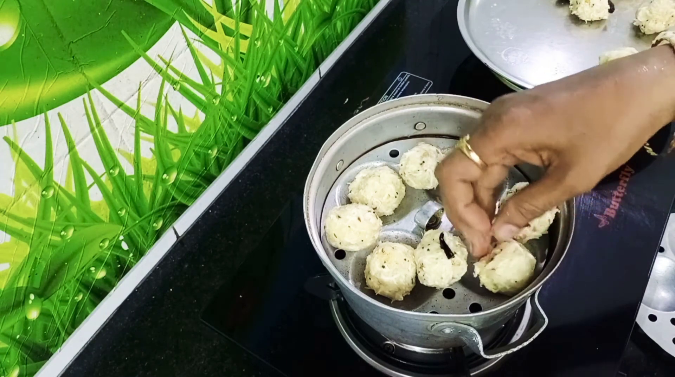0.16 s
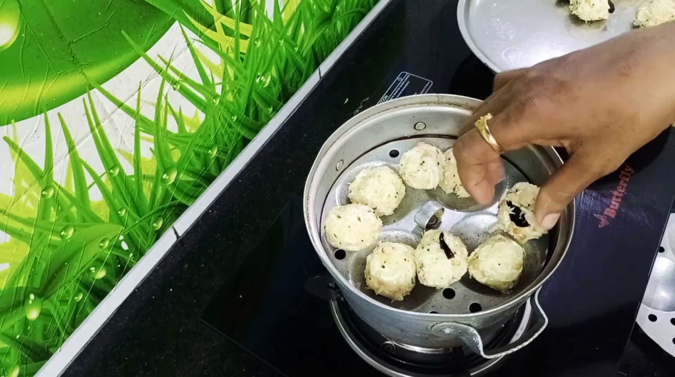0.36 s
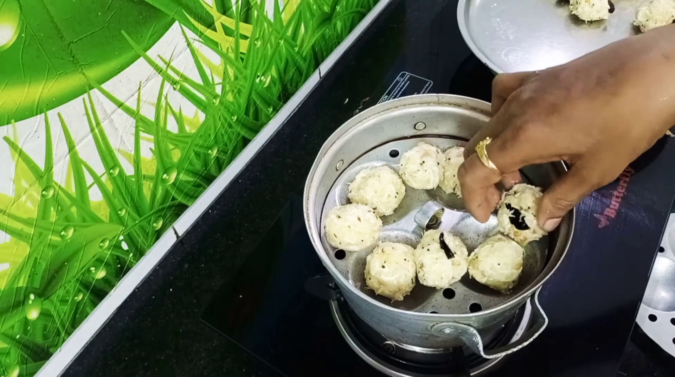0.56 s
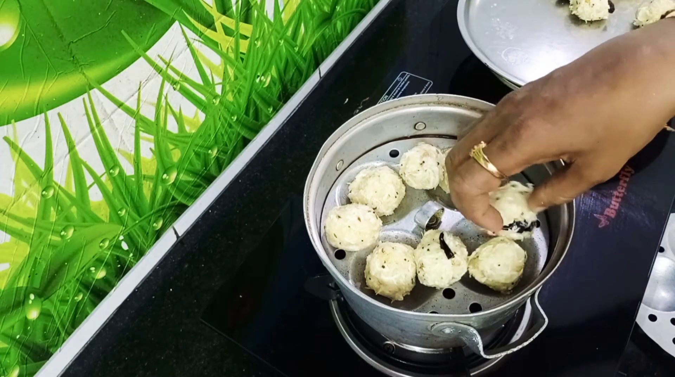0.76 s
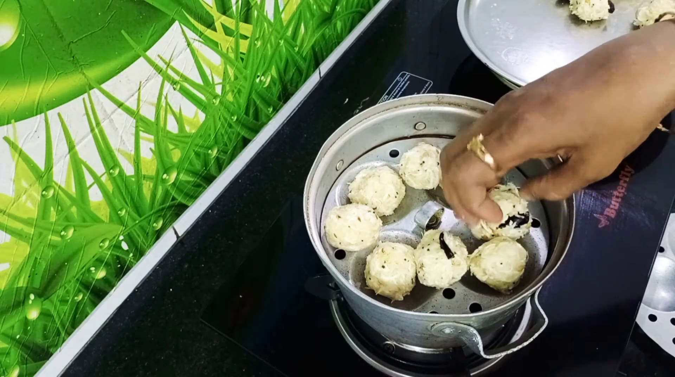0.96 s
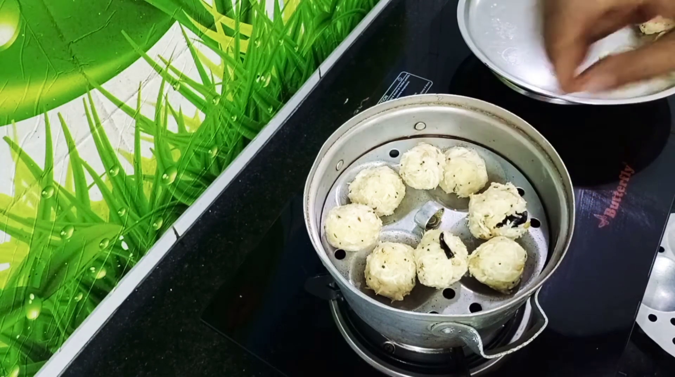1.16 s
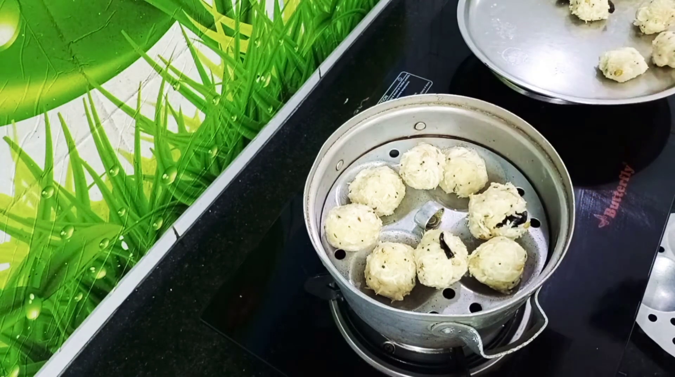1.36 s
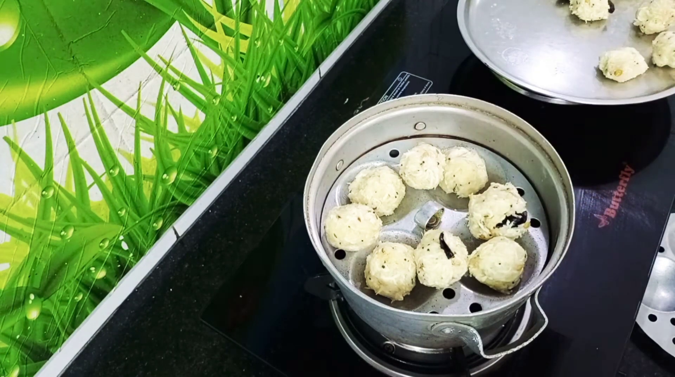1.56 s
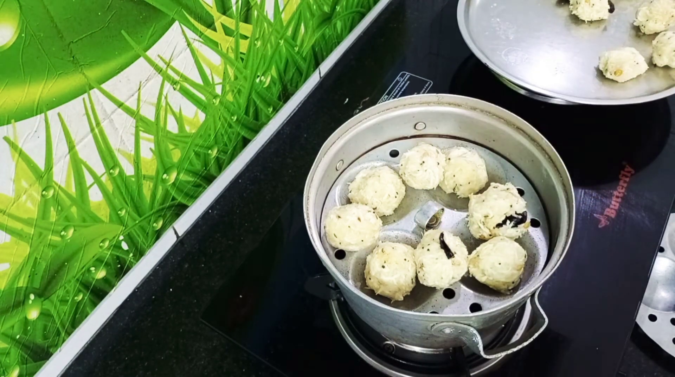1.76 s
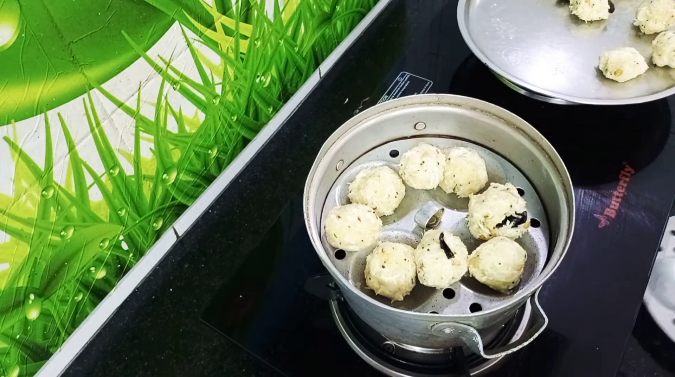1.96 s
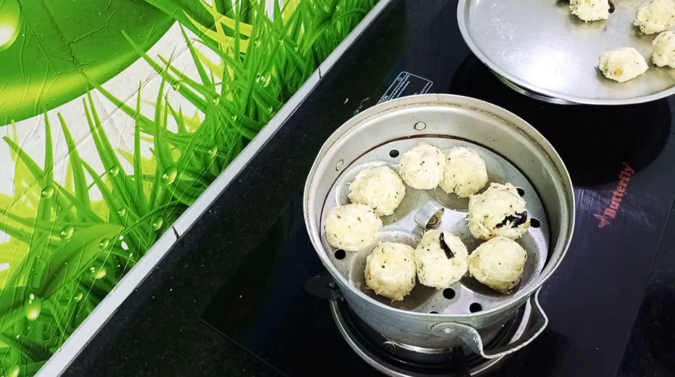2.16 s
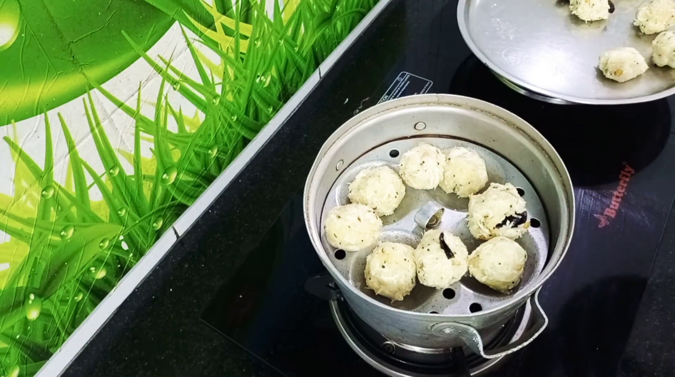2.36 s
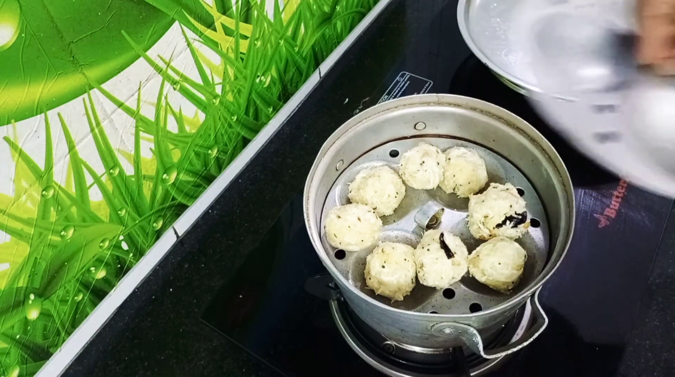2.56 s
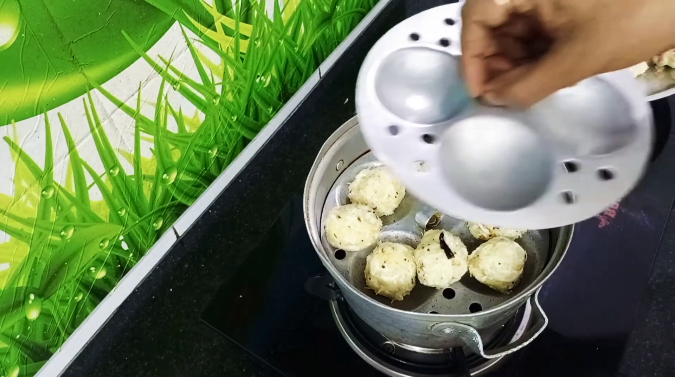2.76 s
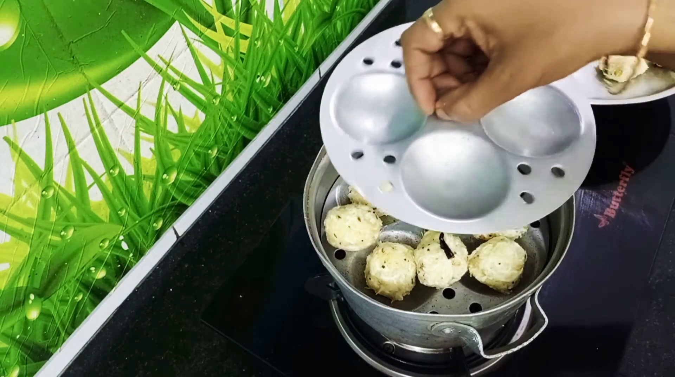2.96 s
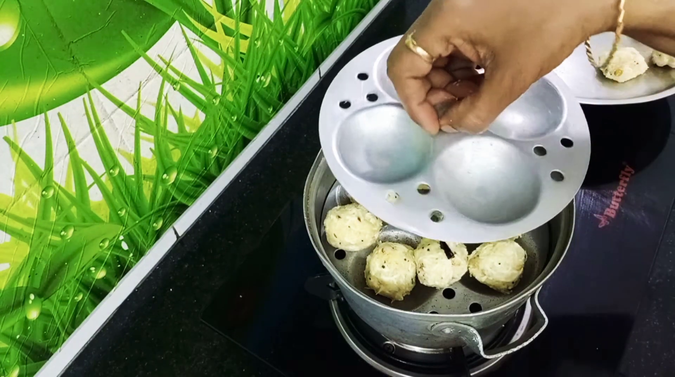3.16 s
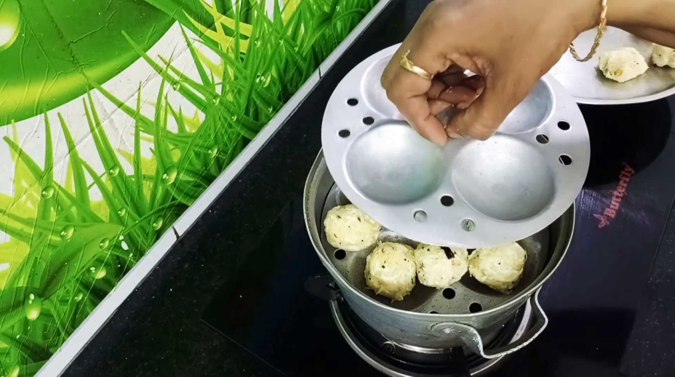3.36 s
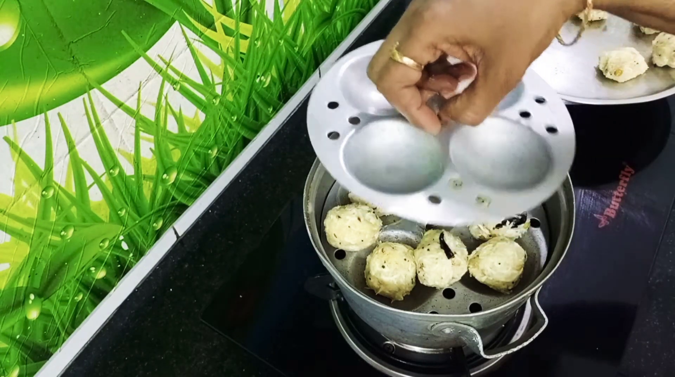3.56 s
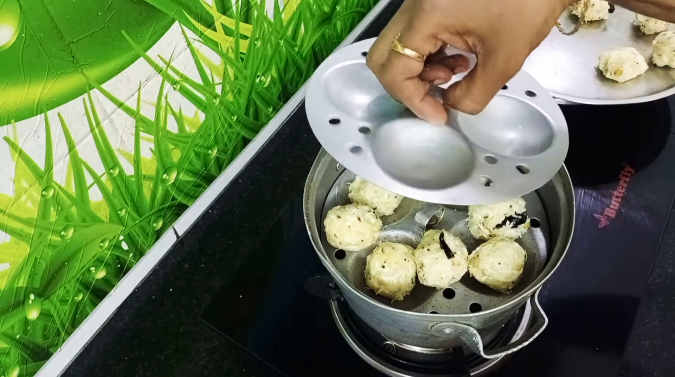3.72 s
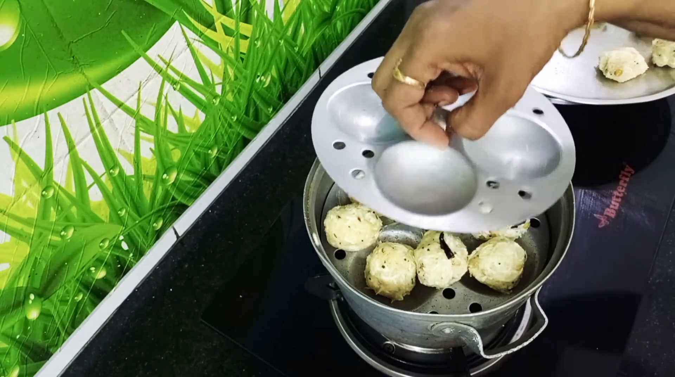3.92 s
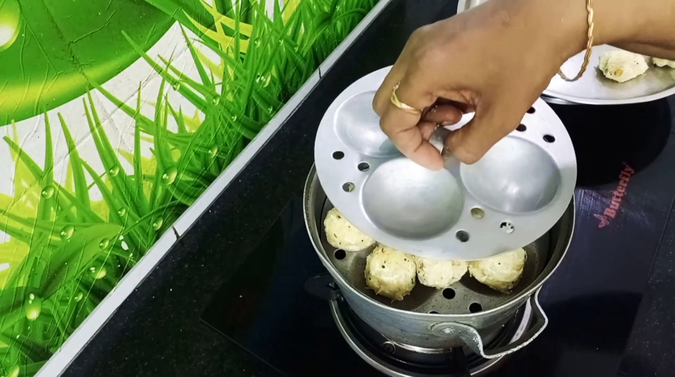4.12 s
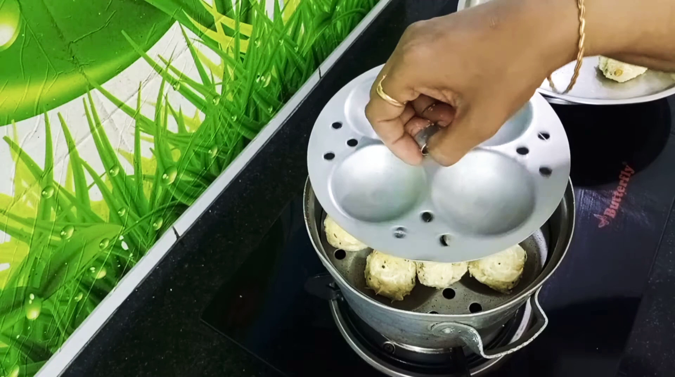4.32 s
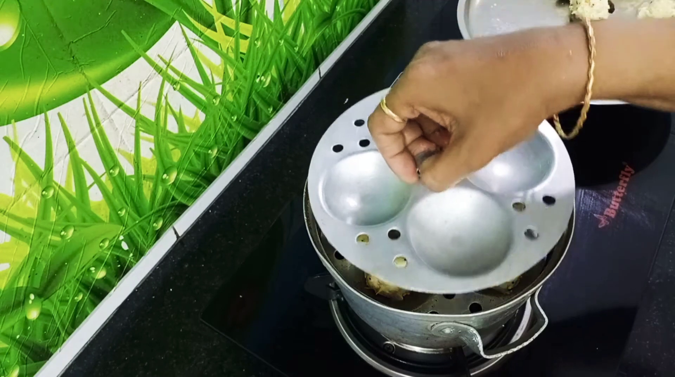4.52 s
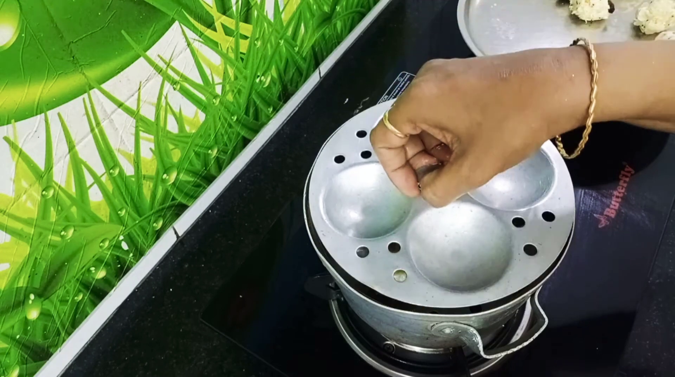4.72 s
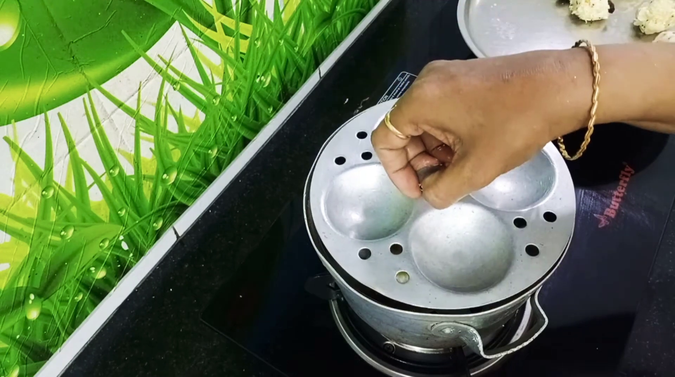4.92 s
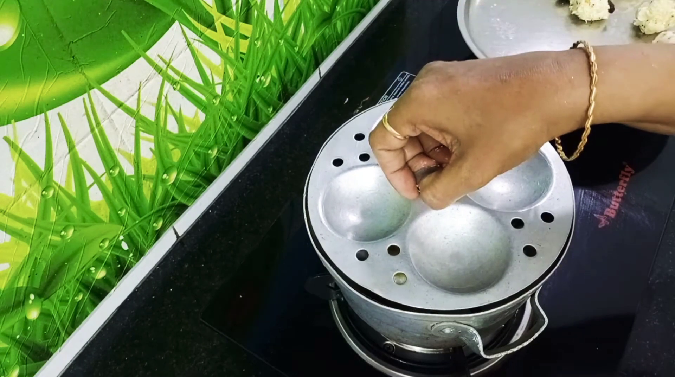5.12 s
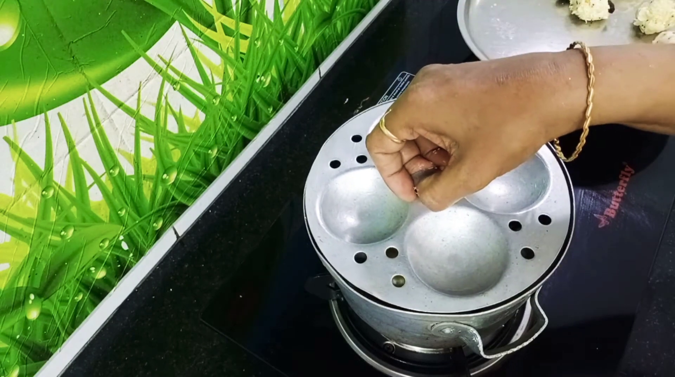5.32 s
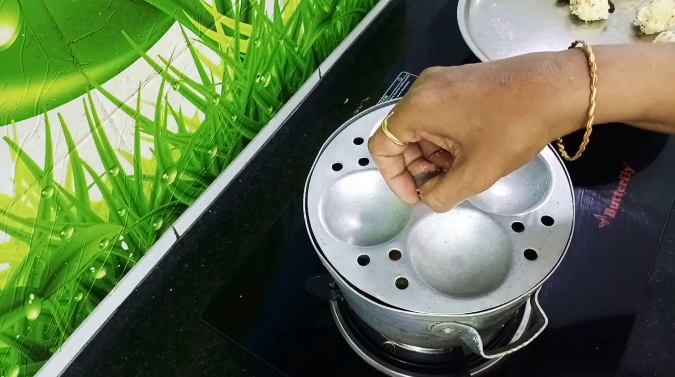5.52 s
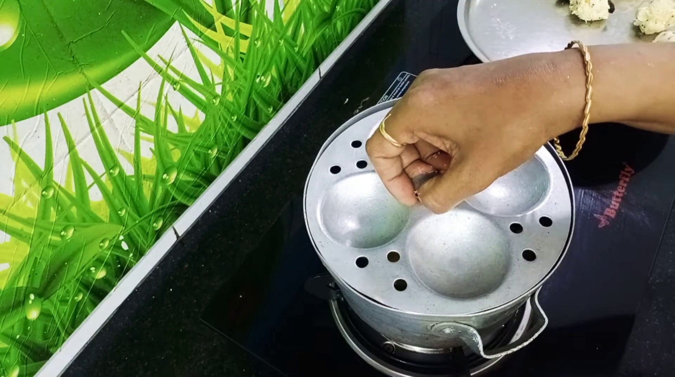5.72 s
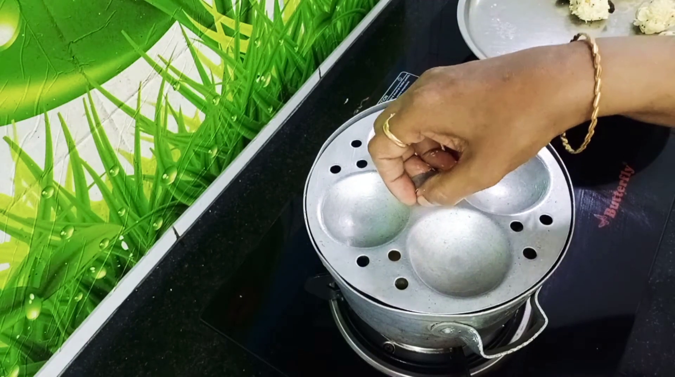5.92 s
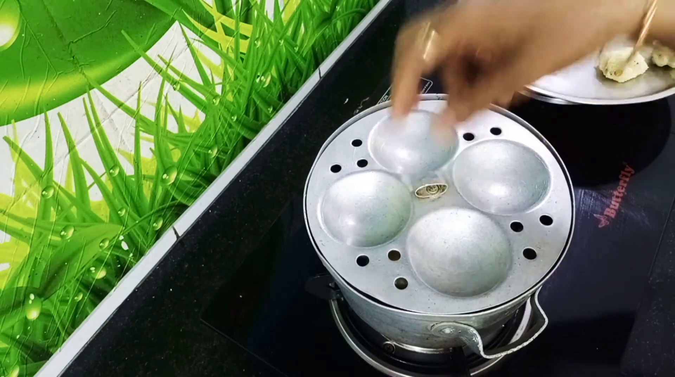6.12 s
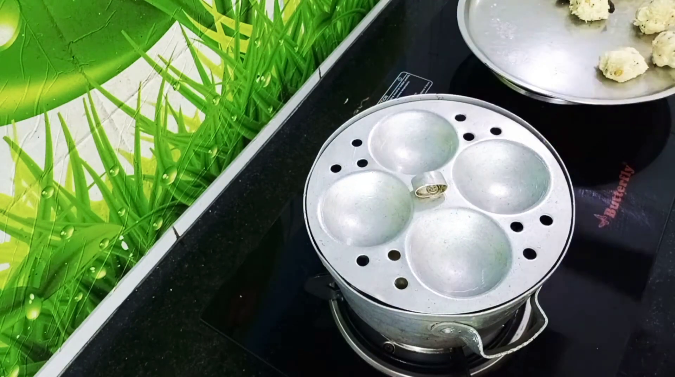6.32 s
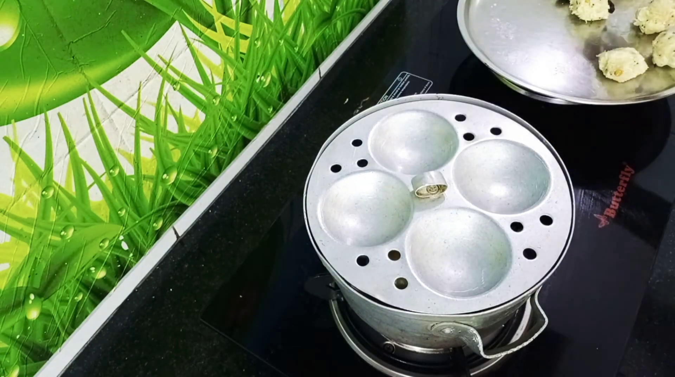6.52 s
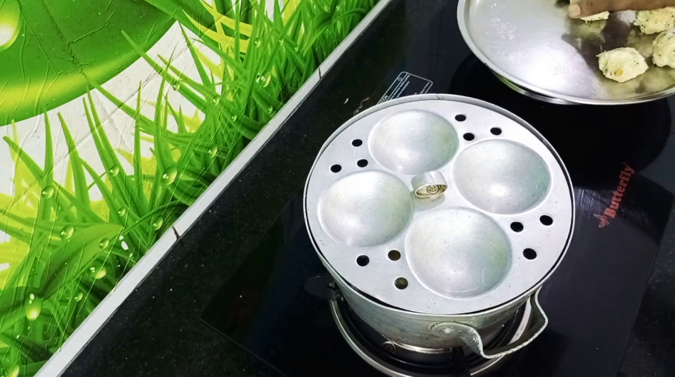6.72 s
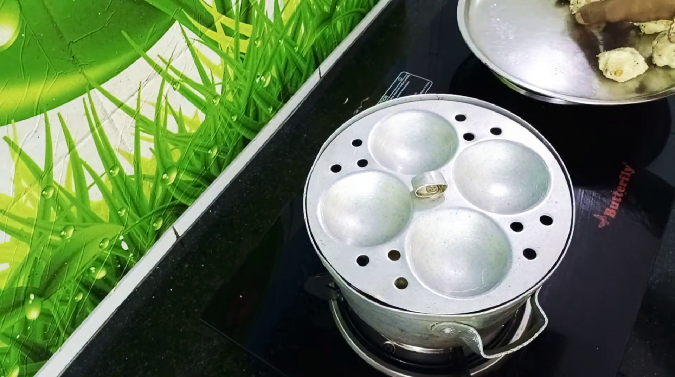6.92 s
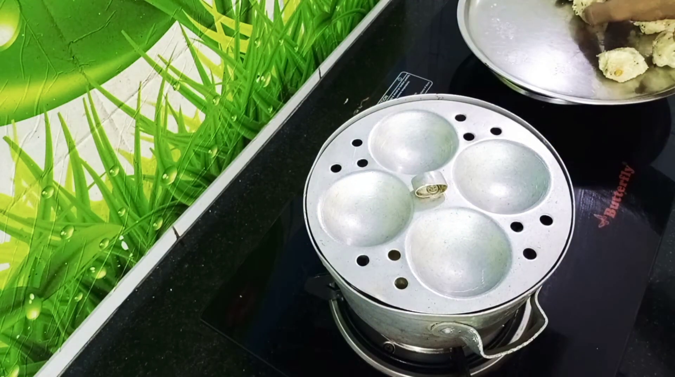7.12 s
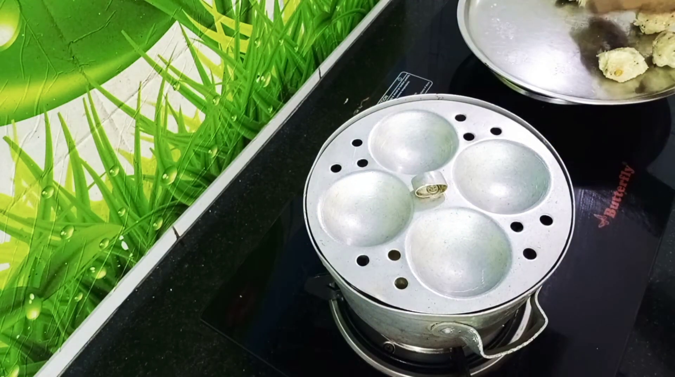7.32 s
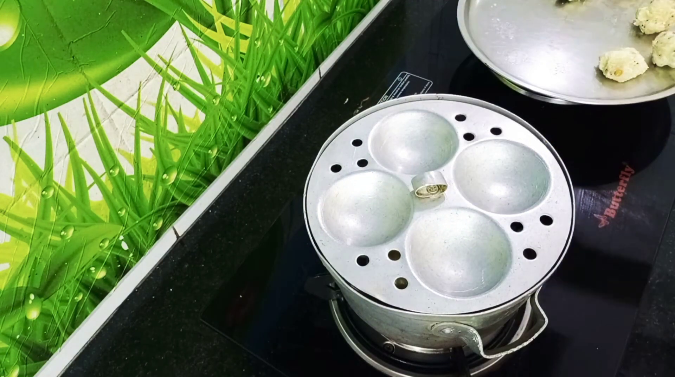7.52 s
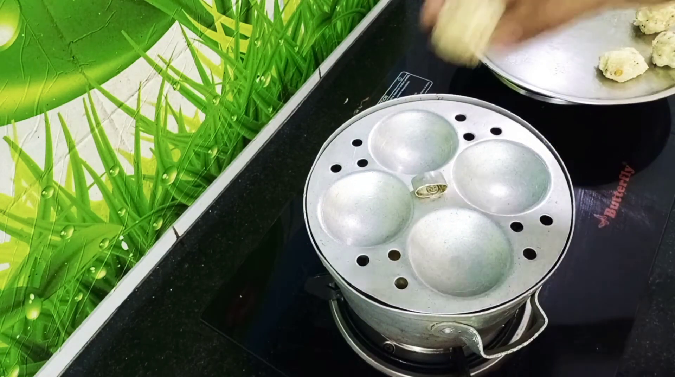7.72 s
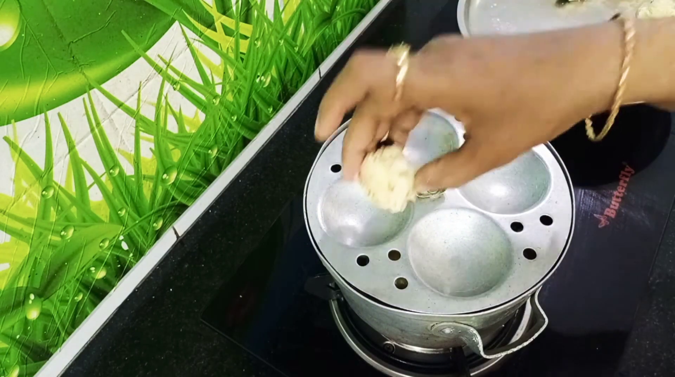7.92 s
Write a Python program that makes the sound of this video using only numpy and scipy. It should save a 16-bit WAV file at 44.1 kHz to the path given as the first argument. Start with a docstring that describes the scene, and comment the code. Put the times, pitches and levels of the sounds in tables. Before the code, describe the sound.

Quiet handling bumps over steady room noise, then a loud, ringing clank of a thin aluminium plate and its fading hum. A pause later it strikes the pot rim with a shorter, damped clank, followed by small rubs, squeals and light clicks. Finger scuffs and a very faint drone end it. Close stereo microphone, slight hard-walled kitchen reverberation.

```python
"""A low rumble and a thin high hiss (filtered noise) fill a small kitchen; fingers scuff metal.
An aluminium steamer plate grazes, then clanks as it is picked up: blows ring its decaying modes.
A low mode hums while it is carried over a pot; short raspy tones near 3.6 kHz (warbling sines) are
faint chirps, and late ones like the plate ringing. Dropped onto the rim, it scrapes, squeals and
clicks into its seat by stick-slip and blows; a tray rings in two beating modes, a far drone swells."""
import sys
import numpy as np
from scipy import signal
from scipy.fft import rfft, irfft
from scipy.io import wavfile
from scipy.ndimage import uniform_filter1d

SR = 44100
rng = np.random.default_rng(int(sys.argv[2]) if len(sys.argv) > 2 else 0)


def generate_wav(sig):
    """Save sig (samples, or channels by samples) to the path in sys.argv[1] as 16-bit PCM at SR."""
    pcm = np.round(np.clip(np.atleast_2d(sig).T, -1, 1) * 32767).astype(np.int16)
    wavfile.write(sys.argv[1], SR, pcm)


N = 351735
TIME = np.arange(N) / SR  # seconds

# Blows on the free plate. Each row: start in seconds, strength in dB, brightness in dB per octave.
PICK_UP = [(2.0922, 1, 0.5), (2.139, -13.5, -1.5)]
# Spectrum of steady air noise. Each row: frequency in Hz, relative density in dB per Hz.
AIR = [(20, -118), (50, -110), (90, -100), (190, -101), (420, -107), (600, -112), (1100, -111),
       (2200, -117), (3400, -116), (5000, -120), (9000, -124), (15500, -122)]
SLIDE_RISE_S, SLIDE_FALL_DB_PER_S = 0.021, 300


def amp(db):
    """Level to amplitude ratio: 20 dB is a factor of ten."""
    return 10 ** (np.asarray(db) / 20)


def read(points, hz):
    """Interpolation on a logarithmic frequency axis, which is close to how pitch is heard."""
    f, value = np.transpose(points)
    return np.interp(np.log(hz + 1), np.log(f), value)


def swell(start_s, length_s, db, rise_s, fall_db_per_s):
    """Envelope: a linear rise, a hold until the length is over, then exponential decay."""
    rise = np.clip((TIME - start_s) / rise_s, 0, 1)
    after_s = np.maximum(TIME - start_s - length_s, 0)
    return rise * amp(db - fall_db_per_s * after_s)


def add(mix, start_s, sound):
    """Superposition: mixes a sound in from its start time."""
    part = mix[round(start_s * SR):][:len(sound)]
    part += sound[:len(part)]


def colour(x, points):
    """Linear filtering: gives white sound of unit power a spectrum in dB per Hz."""
    gain = amp(read(points, np.fft.rfftfreq(len(x), 1 / SR)))
    return irfft(rfft(x) * gain, len(x)) * np.sqrt(SR / 2)


def die_away(x, t60, tilt_db=0):
    """Frequency-dependent damping: each band decays at its own speed, tilted about 2 kHz."""
    hz, t, bands = signal.stft(x, SR, nperseg=256)
    octaves = np.log2(np.maximum(hz, 250) / 2000)
    level_db = tilt_db * octaves[:, None] - 60 * t / read(t60, hz)[:, None]
    return signal.istft(bands * amp(level_db), SR, nperseg=256)[1][..., :x.shape[-1]]


def wander(rate_hz):
    """Slow random fluctuation: low-passed noise of unit size."""
    lowpass = np.exp(-(np.fft.rfftfreq(N, 1 / SR) / rate_hz) ** 2)
    x = irfft(rfft(rng.standard_normal(N)) * lowpass, N)
    return x / x.std()


def slips(per_s, spread_db):
    """Stick-slip friction: tiny random impulses of uneven size, scaled to unit power."""
    happens = rng.random(N) < per_s / SR
    boost = amp(spread_db * np.minimum(rng.exponential(1, N), 4))
    x = happens * rng.standard_normal(N) * boost
    return x / x.std()


def rumble_and_bumps():
    """Low-frequency noise: a drifting rumble, lifted in dull bumps by the hand at the pot and tray."""
    # Each row: frequency in Hz, relative density in dB per Hz.
    rumble = [(40, -120), (75, -100), (105, -85), (150, -99), (250, -115), (600, -140)]
    # Each row: start in seconds, length in seconds, relative level in dB.
    bumps = [(.53, .07, 0), (1.13, 0.39, -6), (1.891, .16, 10), (5.765, 0.034, 4.5), (6.25, .2, -1.5),
             (7.03, .32, -5)]
    steady = amp(-4 + .7 * wander(3))  # mean level and drift in dB
    handling = sum(swell(s, length, db, rise_s=0.028, fall_db_per_s=139.5) for s, length, db in bumps)
    return colour(rng.standard_normal(N), rumble) * (steady + handling)


def air_and_hiss():
    """Broadband noise of still air, and a narrow high band whose level flickers."""
    # Each row: frequency in Hz, relative density in dB per Hz.
    hiss = [(6050, -135), (6330, -103), (6500, -105), (6950, -100), (7650, -105), (8000, -118),
            (8700, -135)]
    air, high = rng.standard_normal((2, N))
    return colour(air, AIR) + colour(high, hiss) * amp(1.1 * wander(18))


def fan_tone():
    """A faint fan tone: a sine with slow random frequency and amplitude modulation."""
    turns = np.cumsum(511 + 4 * wander(8)) / SR  # about 511 Hz
    return amp(-82.5) * (1 + .5 * wander(6)) * np.sin(2 * np.pi * turns)


def scuffs():
    """Friction of fingers on metal: grainy slips under strokes that rise fast and fade."""
    # Each row: start in seconds, length in seconds, relative level in dB.
    strokes = [(0.53, 0.074, -28), (6.41, 0.056, -13), (6.759, 0.071, 2)]
    # Each row: frequency in Hz, relative density in dB per Hz.
    scuff_colour = [(100, -105), (350, -89.5), (550, -105), (800, -100), (1100, -106), (1500, -85.5),
                    (2200, -90), (3100, -88.5), (4300, -99.5), (5700, -104), (7500, -101), (9000, -124),
                    (15000, -135)]
    pressure = np.zeros(N)
    for s, length, db in strokes:
        u = np.maximum(TIME - s, 0) / length
        pressure += amp(db) * 3.6 * u * np.exp(-1.9 * u ** 1.84)
    return colour(slips(per_s=2900, spread_db=1.5) * pressure, scuff_colour)


def friction(pressure, resonances):
    """Friction-driven resonance: tiny slips of the sliding rim feed a few damped modes."""
    drive = slips(per_s=1500, spread_db=5.0) * pressure
    out = np.zeros(N)
    for hz, width, db in resonances:
        # two peaks in series, the first twice as wide, cut the skirts
        wide = signal.lfilter(*signal.iirpeak(hz, hz / width / 2, SR), drive)
        narrow = signal.lfilter(*signal.iirpeak(hz, hz / width, SR), wide)
        out += amp(db) * np.sqrt(SR / np.pi / width) * narrow
    return out


def rim_rub():
    """Stick-slip of the rim: a soft graze before the lift, then pushes that scrape and squeal."""
    # Each row: start in seconds, length in seconds, relative scrape and squeal levels in dB.
    slides = [(4.85, 0.048, 4, -2), (4.981, 0.07, -9, -20), (5.239, 0.021, -0.5, 9.5),
              (5.295, 0.048, -3, -6), (5.369, 0.034, -4.5, 11.5), (5.498, 0.039, -2.5, 5),
              (5.65, 0.043, -6.5, -2), (5.709, 0.034, -5, 7)]
    # Resonances of graze, scrape and squeal. Each row: frequency in Hz, width in Hz, relative level in dB.
    graze_modes = [(1600, 33, 2), (2849, 30, -5), (3580, 40, -10.5), (4700, 40, -11), (5530, 82, -6.5),
                   (6050, 50, -6.5)]
    rub_modes = [(552, 51, 6.5), (607, 19, -9), (1510, 220, -6.5), (3880, 70, -26), (4260, 130, -15),
                 (5640, 230, 0), (7000, 600, 2)]
    squeal_modes = [(3940, 34, -6), (4350, 98, -2.5), (4500, 67, -22)]
    graze = swell(1.93, .05, db=-67.5, rise_s=.035, fall_db_per_s=SLIDE_FALL_DB_PER_S)
    scrape, squeal = np.zeros((2, N))
    for s, length, scrape_db, squeal_db in slides:
        push = swell(s, length, 0, SLIDE_RISE_S, SLIDE_FALL_DB_PER_S)
        scrape += amp(-64 + scrape_db) * push
        squeal += amp(-68.5 + squeal_db) * push
    return friction(graze, graze_modes) + friction(scrape, rub_modes) + friction(squeal, squeal_modes)


def raspy_tones(length_s=0.083):
    """Frequency modulation: faint chirps, and late tones like the plate ringing, rasp by fast warble."""
    # Each row: start in seconds, relative amplitude in dB, frequency in Hz.
    tones = [(2.0, -58.5, 3415), (2.61, -64, 3650), (3.04, -62, 3624), (4.26, -62, 3600), (4.54, -62, 3600),
             (5.04, -58, 3584), (5.3, -57.5, 3603), (5.489, -60, 3566), (5.72, -60, 3600)]
    out, t = np.zeros(N), np.arange(int(length_s * SR)) / SR
    warble_hz = 80 * wander(140)
    for s, db, hz in tones:
        pitch_hz = hz + warble_hz[round(s * SR):][:len(t)]
        tone = np.sin(2 * np.pi * np.cumsum(pitch_hz) / SR)
        add(out, s, amp(db) * np.sin(np.pi * t / length_s) * tone)
    return out


def weak_modes(per_hz, spread_db):
    """Modal density: a second of steady partials, one at random in each slice of the spectrum."""
    slots = np.arange(int(per_hz * SR / 2) - 1)
    place, size, phase = rng.random((len(slots), 3)).T
    lines = np.zeros(SR // 2 + 1, complex)
    bins = ((slots + place) / per_hz).astype(int)
    lines[bins] = amp(spread_db * size) * np.exp(2j * np.pi * phase)
    x = irfft(lines, SR)
    return x / x.std()  # unit power


def strike(blows, modes, crowd, ring_db, damping, crack_db, crack_s):
    """Modal impact: each blow rings strong modes, a crowd of weak ones and a short contact crack."""
    # Decay of the weak modes before damping. Each row: frequency in Hz, t60 in seconds.
    undamped_t60 = [(100, 0.26), (600, .36), (1500, 0.49), (4000, 0.53), (8000, 0.39), (15000, 0.13)]
    crowd_t60 = [(hz, t60 / damping) for hz, t60 in undamped_t60]
    t, out = np.arange(SR) / SR, np.zeros(N)
    hz, db, t60 = np.transpose(modes)[:, :, None]
    octaves = np.log2(hz / 2000)
    sign = (-1) ** np.arange(len(modes))[:, None]
    # each mode has a faint partner a little off in pitch, so it beats and wavers
    beat_hz = rng.uniform(8, 30, hz.shape)
    partner = np.sin(2 * np.pi * (hz + sign * beat_hz) * t)
    tones = sign * (np.sin(2 * np.pi * hz * t) + .4 * partner)
    dense = weak_modes(per_hz=.02, spread_db=18) + .25 * rng.standard_normal(SR)
    partials = colour(dense, crowd)
    for s, blow_db, tilt_db in blows:
        ring = (amp(ring_db + db + tilt_db * octaves - 60 * t / t60) * tones).sum(0)
        clatter = die_away(np.roll(partials, rng.integers(SR)), crowd_t60, tilt_db)
        crack = colour(rng.standard_normal(SR), crowd) * np.exp(-t / crack_s)
        crack = signal.lfilter(*signal.butter(2, 500, "high", fs=SR), crack)
        crack *= amp(crack_db + 0.067 * blow_db)  # hard blows crack more
        add(out, s, amp(blow_db) * (ring + clatter + crack))
    return out


def pick_up_clank():
    """Free vibration: the unsupported plate rings in its own modes when struck."""
    # Strong modes. Each row: frequency in Hz, relative amplitude in dB, t60 in seconds.
    plate = [(380, -37, .3), (532, -47, .42), (745, -35, .33), (781, -29.5, .35), (1295, -31, .42),
             (1324, -26.5, .42), (1340, -26.5, .42), (1414, -34, .42), (1582, -30.5, .48), (1766, -39, .4),
             (2350, -38, .22), (2779, -30, .37), (2849, -26.5, .44), (3540, -42, .35), (3741, -35, .46),
             (3860, -38, .48), (4161, -42, .38), (4366, -33.5, .32), (4655, -28.5, .39), (5340, -42, .36),
             (5519, -37, .4), (6170, -28.5, .35), (6533, -31, .42), (7101, -36, .39), (7440, -35, .37),
             (7888, -27.5, .3), (8468, -39, .35), (9114, -44, .46), (10640, -41, .27), (11010, -43, .26)]
    # Weak modes. Each row: frequency in Hz, relative density in dB per Hz.
    plate_crowd = [(45, -108), (110, -70), (180, -78), (260, -71), (420, -69), (600, -76), (780, -71),
                   (1050, -76), (1350, -66), (2300, -74), (3250, -79), (4400, -73), (5200, -78),
                   (7600, -69), (9500, -76), (15500, -76)]
    return strike(PICK_UP, plate, plate_crowd, ring_db=-1, damping=1.05, crack_db=11, crack_s=.006)


def plate_hum():
    """Low mode: held at its centre, the plate blooms, hums and flutters until the grip tightens."""
    struck_s, grip_s, rise_s = PICK_UP[0][0], 2.937, .07
    bloom = swell(struck_s, .11, db=-50, rise_s=rise_s, fall_db_per_s=223)
    held = swell(struck_s, grip_s - struck_s, db=-55, rise_s=rise_s, fall_db_per_s=71)
    held *= amp(-9 * (TIME - struck_s))  # sags by a further 9 dB per second throughout
    flutter = 1 + .16 * wander(14)
    return (bloom + held) * flutter * np.sin(2 * np.pi * 485.7 * TIME)


def seating_clank():
    """Coupled vibration: blows of the plate on the pot ring the modes of the plate lying there."""
    # Each row: start in seconds, strength in dB, brightness in dB per octave.
    seating = [(4.7388, -2, 0), (4.7675, -16.5, -1.5), (4.863, -29.5, -6)]
    # Strong modes. Each row: frequency in Hz, relative amplitude in dB, t60 in seconds.
    pot = [(498, -43, .38), (533, -41, .33), (592, -44, .42), (1168, -41, .21), (1397, -40, .38),
           (1440, -29, .29), (1500, -19, .33), (1583, -36, .45), (1814, -35, .44), (1896, -38, .35),
           (2080, -39, .24), (2842, -29, .35), (3095, -43, .28), (3537, -34, .32), (3575, -36, .33),
           (3854, -42, .27), (4161, -40, .24), (4683, -43, .27), (5437, -40, .28), (5513, -41, .28),
           (5590, -41, .22), (5905, -39, .24), (6694, -31, .28), (7154, -33, .23), (7434, -41, .23),
           (7876, -41, .2), (9039, -42, .18), (9722, -41, .19), (10830, -38, .16)]
    # Weak modes. Each row: frequency in Hz, relative density in dB per Hz.
    pot_crowd = [(45, -105), (110, -73), (270, -78), (400, -89), (550, -60), (800, -72), (1100, -77),
                 (1450, -63), (1700, -68), (2000, -62), (2400, -73), (3600, -69), (4700, -74), (7000, -67),
                 (8500, -78), (15500, -79)]
    return strike(seating, pot, pot_crowd, ring_db=-.5, damping=1.4, crack_db=8, crack_s=.007)


def seat_clicks():
    """Damped impact: light clicks as the rim slips into its seat, the plate damped by the hand."""
    # Each row: start in seconds, strength in dB, brightness in dB per octave.
    clicks = [(5.2495, -4, -0.5), (5.405, -16, 2), (5.5215, -1.5, -5.5), (5.662, -21, 1),
              (5.7115, 3.5, -0.5)]
    # Strong modes. Each row: frequency in Hz, relative amplitude in dB, t60 in seconds.
    seated = [(598, -61, 0.23), (1020, -68, 0.39), (1233, -58.5, 0.086), (1427, -51.5, 0.12),
              (1520, -55.5, 0.17), (1816, -59, 0.21), (2176, -62, 0.16), (2820, -65.5, 0.18),
              (3610, -59.5, 0.3), (4350, -58, 0.15), (5680, -51, 0.082), (6750, -50, 0.1)]
    # Weak modes. Each row: frequency in Hz, relative density in dB per Hz.
    click_crowd = [(50, -125), (220, -100), (420, -98.5), (580, -78.5), (900, -95.5), (1350, -85.5),
                   (1900, -88.5), (2600, -99), (4200, -94.5), (5500, -90.5), (7500, -85.5), (9500, -108),
                   (12000, -128)]
    return strike(clicks, seated, click_crowd, ring_db=0, damping=1.6, crack_db=-2, crack_s=.005)


def tray_ring():
    """Beating: the tray rings in two close modes that interfere as they fade after the touch."""
    start_s, hz, beat_hz = 6.92, 1530, 12.5
    turns = np.cumsum(hz + 6 * wander(30)) / SR
    partner = np.sin(2 * np.pi * (turns + beat_hz * (TIME - start_s)))
    pair = np.sin(2 * np.pi * turns) - 0.63 * partner
    return swell(start_s, 0, db=-76, rise_s=SLIDE_RISE_S, fall_db_per_s=26) * pair


def far_drone():
    """Band-limited noise: a faint drone that swells near the end."""
    # Each row: frequency in Hz, relative density in dB per Hz.
    drone = [(850, -130), (1080, -100), (1220, -100), (1450, -130)]
    level = swell(7.47, 0.27, db=1.5, rise_s=.14, fall_db_per_s=22)
    return colour(rng.standard_normal(N), drone) * level


def room(x):
    """Reverberation: convolution with the dense, decaying reflections of a small tiled kitchen."""
    # Each row: frequency in Hz, t60 in seconds.
    room_t60 = [(100, 0.24), (1000, 0.32), (5000, 0.2), (15000, .26)]
    size = SR // 2
    taps = rng.choice([-1., 1.], size) * (rng.random(size) < .06)
    taps *= TIME[:size] > .005  # no reflection in the first 5 ms
    tail = die_away(taps, room_t60)
    return signal.fftconvolve(x, tail / np.linalg.norm(tail))[:N]


def scene():
    """Superposition at one spot; the two microphone ports differ mostly in colour."""
    # Each row: frequency in Hz, left minus right in dB.
    balance = [(60, 2.5), (400, 3), (750, 5), (1300, 7), (2400, 4), (4500, 5.5), (6200, 2), (7300, -7),
               (8600, -12.5), (11000, -9), (13000, -1), (15500, -5.5)]
    metal = pick_up_clank() + seating_clank() + seat_clicks()
    near = metal + rim_rub() + scuffs() + tray_ring()
    faint = raspy_tones() + far_drone()
    background = rumble_and_bumps() + air_and_hiss() + fan_tone()
    heard = near + amp(-11) * room(near)
    mono = heard + plate_hum() + amp(-3) * (faint + room(faint)) + background
    lean = amp(read(balance, np.fft.rfftfreq(N, 1 / SR)))
    gains = 2 * np.array([lean, np.ones_like(lean)]) / (1 + lean)  # left, right
    ports = irfft(rfft(mono) * gains, N)
    # reverberation and air noise in opposite sign widen the image
    apart = amp(-25) * room(near) + amp(-7.5) * colour(rng.standard_normal(N), AIR)
    return ports + np.array([apart, -apart])


def record(dry, threshold_db=-23, squeeze=0.33, recover_db_per_s=150):
    """Dynamic compression: gain control reduces levels over a threshold; then a band limit."""
    power = uniform_filter1d((dry ** 2).mean(0), size=300)
    power_db = 10 * np.log10(abs(power) + 1e-12)
    # a running peak that falls back at a steady rate
    fall = TIME * recover_db_per_s
    peak_db = np.maximum.accumulate(power_db + fall) - fall
    over_db = np.maximum(peak_db - threshold_db, 0)
    held = dry / amp(squeeze * uniform_filter1d(over_db, size=150))
    lowpass = signal.firwin(255, 15600, window=("kaiser", 8), fs=SR)  # edge in Hz
    return signal.oaconvolve(held, lowpass[None], "same")


dry = scene()
out = record(dry)
generate_wav(out)
```